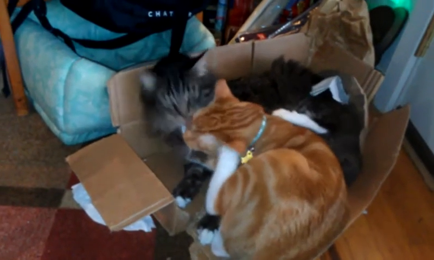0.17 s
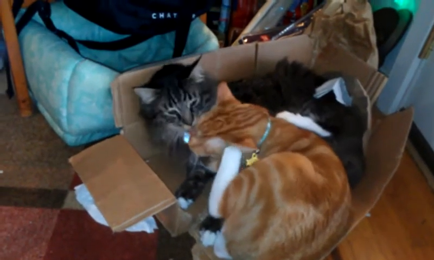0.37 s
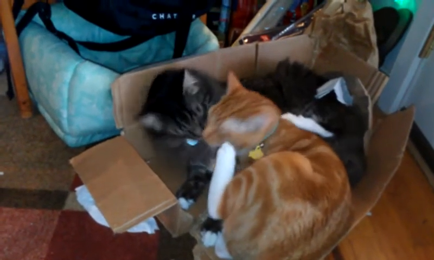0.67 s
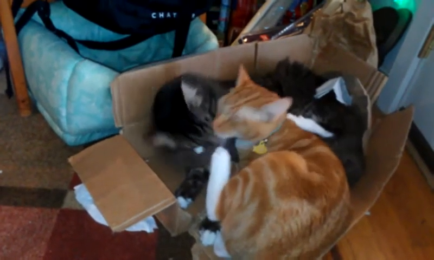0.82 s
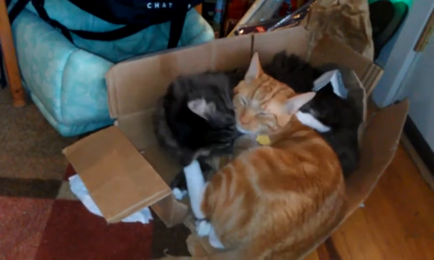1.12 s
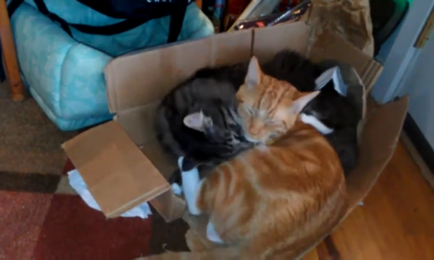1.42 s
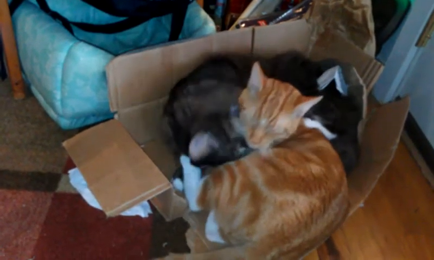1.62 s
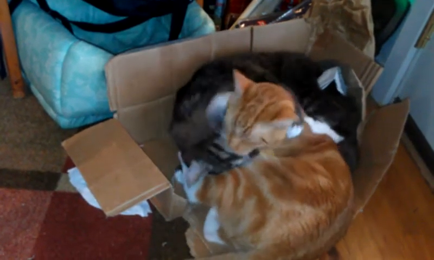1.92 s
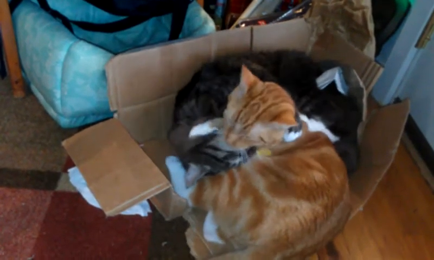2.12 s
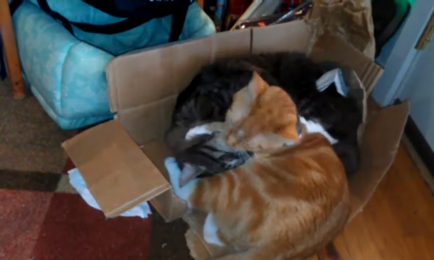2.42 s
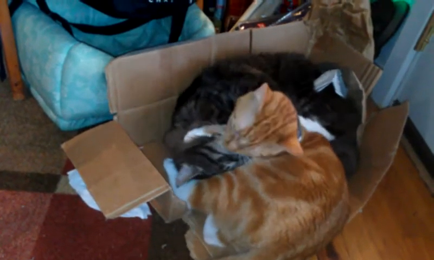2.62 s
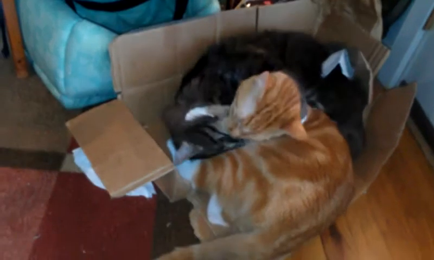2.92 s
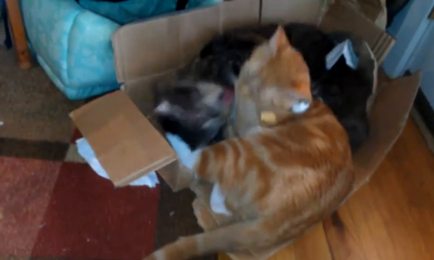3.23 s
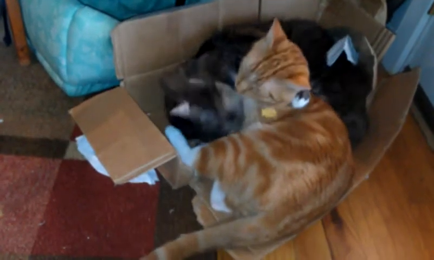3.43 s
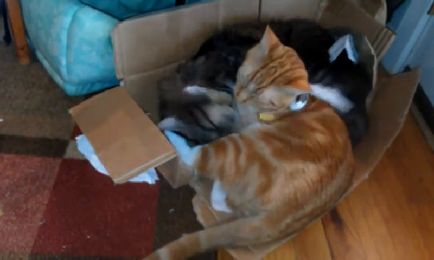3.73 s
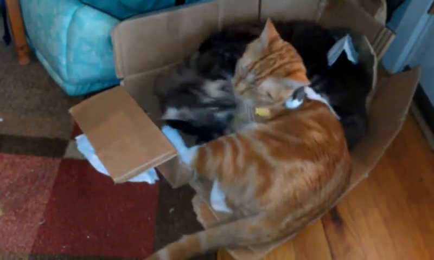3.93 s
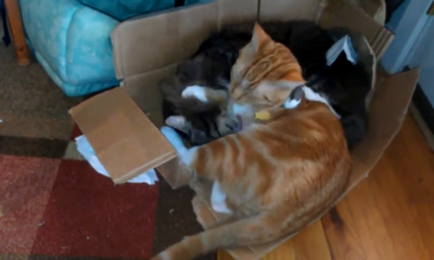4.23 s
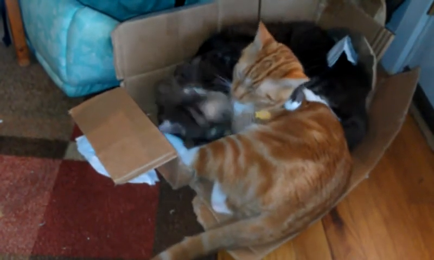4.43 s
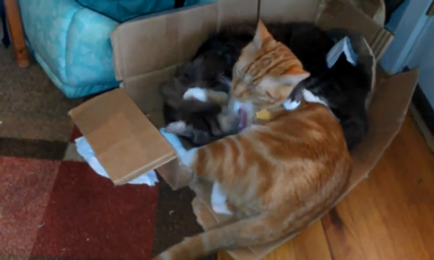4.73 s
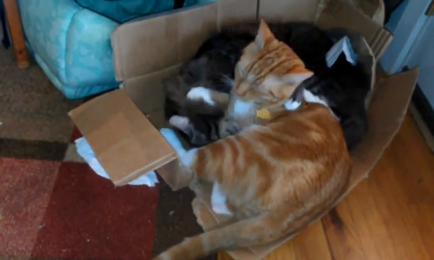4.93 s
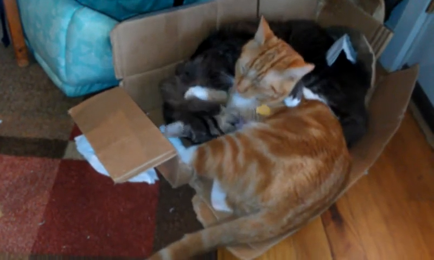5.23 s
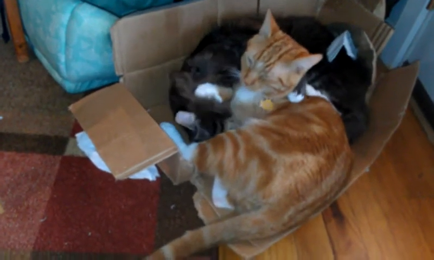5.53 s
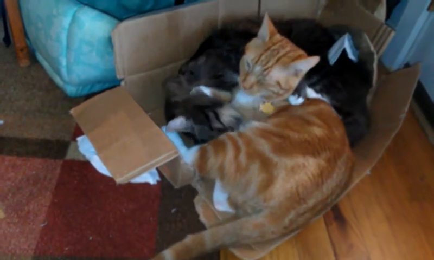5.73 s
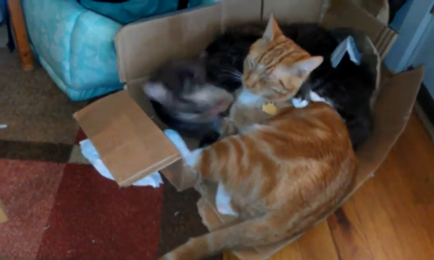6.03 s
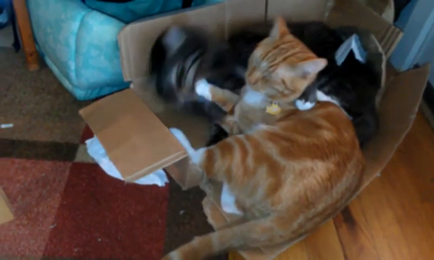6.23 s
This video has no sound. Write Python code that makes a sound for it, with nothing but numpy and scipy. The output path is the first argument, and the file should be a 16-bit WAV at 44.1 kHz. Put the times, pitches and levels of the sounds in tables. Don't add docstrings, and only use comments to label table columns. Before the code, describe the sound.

Close, bright fur-on-cardboard scraping and snapping builds to a knock, fades into sparse licking ticks, then bursts again, above humming indoor air.

```python
import sys
import numpy as np
from scipy import signal
from scipy.io import wavfile
from scipy.ndimage import uniform_filter1d

SR = 44100
rng = np.random.default_rng(int(sys.argv[2]) if len(sys.argv) > 2 else 0)


def how_loud(loudness_db):
    steps = np.asarray(loudness_db, float) / 20
    return 10 ** steps


def output_pcm(signal):
    pcm = np.clip(np.atleast_2d(signal).T, -1, 1) * 32767
    wavfile.write(sys.argv[1], SR, np.round(pcm).astype(np.int16))


N = 280476

# pitch_hz, level_db
CARD = [(300, -30), (900, -19.5), (1400, -28.5), (2080, -22), (2600, -7), (3050, 0), (3500, -8),
        (4000, -21), (4900, -31), (5400, -29.5), (7900, -33.5), (11500, -39.5), (14100, -25.5),
        (16000, -51)]


def evened(x):
    return x / np.sqrt(np.mean(x ** 2) + 1e-20)


def read(points, hz):
    f, value = np.transpose(points)
    return np.interp(np.log(hz + 1), np.log(f + 1), value)


def add(mix, s, sound):
    part = mix[round(s * SR):][:len(sound)]
    part += sound[:len(part)]


def causal(points, depth=1):
    log_gain = depth * np.log(how_loud(read(points, abs(np.fft.fftfreq(4096, 1 / SR)))))
    response = np.fft.ifft(np.exp(np.conj(signal.hilbert(log_gain)))).real[:2048]
    return response / np.linalg.norm(response)


def resonate(x, hz, width):
    turn = np.exp(2j * np.pi * np.cumsum(hz * np.ones(len(x))) / SR)
    r = np.exp(-np.pi * width / SR)
    return 2 * (turn * signal.lfilter([1 - r], [1, -r], x / turn)).real


def band(x, low_hz, high_hz):
    return signal.sosfilt(signal.butter(4, [low_hz, high_hz], "band", fs=SR, output="sos"), x)


def drift(hz):
    slow = signal.butter(1, hz, fs=SR, output="sos")
    return evened(signal.sosfiltfilt(slow, rng.standard_normal(N)))


def air():
    # pitch_hz, level_db_per_hz
    spectrum = [(30, -54), (70, -33.5), (165, -30), (235, -5.5), (420, -5.5), (800, -10.5), (1390, -12.5),
                (2200, -9), (3100, 1.5), (3700, -11.5), (4700, -20.5), (7870, -26.5), (10000, -23),
                (14800, -20)]
    frames, hz = N // 256 + 5, np.fft.rfftfreq(1024, 1 / SR)
    a, b, patches = rng.standard_normal((frames, 513, 3)).T
    patches = evened(uniform_filter1d(uniform_filter1d(patches, 20, 0), 10, 1))
    z = (a + 1j * b) * how_loud(read(spectrum, hz)[:, None] + 1.58 * patches)
    noise = signal.istft(z, nperseg=1024, noverlap=768)[1][:N]
    return how_loud(-45.5) * evened(noise)


def hum():
    # multiple, level_db
    orders = [
        (1, -53),
        (3, -67),
        (4, -73),
    ]
    # pitch_hz, width_hz, level_db
    side_tones = [
        (235.7, 14, -67.5),
        (785.5, 35, -75),
    ]
    # time_s, level_db
    mains = [
        (0.0, -84),
        (2.9, -83.5),
        (4.5, -76),
        (5.7, -82.5),
        (6.36, -77),
    ]
    motor_hz = 315.7
    t = np.arange(N) / SR
    turn = 2 * np.pi * motor_hz * t
    tone = sum(np.sqrt(2) * how_loud(db + 0.27 * drift(1)) * np.sin(k * turn) for k, db in orders)
    buzz = np.sin(2 * np.pi * (120 * t + .15 * drift(4)))
    tone += np.sqrt(2) * how_loud(np.interp(t, *np.transpose(mains))) * buzz
    for hz, width, db in side_tones:
        tone += how_loud(db) * evened(resonate(resonate(rng.standard_normal(N), hz, width), hz, width))
    return tone


def room(x):
    echoes, t = np.zeros(8000), np.arange(8000) / SR
    echoes[np.arange(200, 7980, 20) + rng.integers(0, 20, 389)] = rng.choice([-1., 1.], 389)
    echoes *= how_loud(-60 * t / 0.13)
    return signal.oaconvolve(x, echoes / np.linalg.norm(echoes))[:N]


def brush():
    level_db, middle_s, half_s = -48.5, 1.91, 0.055
    t = np.arange(N) / SR
    stroke = np.exp(-((t - middle_s) / half_s) ** 4)
    return how_loud(level_db) * stroke * band(rng.standard_normal(N), 5000, 17000)


def handling():
    # start_s, peak_db, pitch_hz, width_hz, length_s
    finger_taps = [
        (1.875, -31, 10700, 900, 0.0022),
        (1.933, -33, 5600, 2540, 0.0014),
        (2.7067, -37, 5700, 2500, 0.002),
        (2.748, -37, 10400, 2500, 0.0019),
        (2.786, -32.5, 6200, 2500, 0.0023),
    ]
    # start_s, peak_db, pitch_hz, t60_s
    bumps = [
        (.49, -42, 612, 0.17),
        (1.93, -43, 775, 0.18),
        (2.064, -21.5, 539, 0.03),
        (2.764, -29, 266, 0.033),
        (2.767, -29, 520, 0.018),
        (5.11, -40, 790, 0.064),
    ]
    # pitch_hz, level_db_per_hz
    shell = [(710, -58), (1200, -24), (2450, -12.5), (3400, 0.5), (4700, -17.5), (6230, -5), (7740, -20),
             (8530, -15), (10100, -22), (13600, -12), (16000, -24)]
    slip_s, slip_db, rise_s, slip_t60_s = 2.801, -26.5, 0.0048, 0.084
    out, t = np.zeros(N), np.arange(6000) / SR
    for s, db, hz, width, length in finger_taps:
        push = rng.standard_normal(len(t)) * (t < length)
        ring = resonate(resonate(push, hz, width), hz, width)
        add(out, s, how_loud(db) * ring / abs(ring).max())
    fall_db = slip_db - 60 * np.maximum(t - rise_s, 0) / slip_t60_s
    stroke = np.minimum(t / rise_s, 1) * how_loud(fall_db)
    add(out, slip_s, signal.fftconvolve(stroke * rng.standard_normal(len(t)), causal(shell)))
    for s, db, hz, t60 in bumps:
        swell = how_loud(db - 60 * t / t60) * (1 - np.exp(-t / .003)) ** 2
        add(out, s, swell * np.sin(2 * np.pi * hz * t))
    return out


def nails():
    # start_s, peak_db, pitch_hz
    clicks = [(0.194, -16.5, 4070), (1.0755, -41, 3920), (1.3784, -37, 4130), (1.435, -22, 3720),
              (1.4484, -36, 4050), (2.4588, -50, 4180), (3.1038, -47, 3850), (3.1684, -20.5, 3800),
              (3.5174, -43, 3910), (4.5515, -19, 4600), (5.407, -34, 3930)]
    out, t = np.zeros(N), np.arange(900) / SR
    for (s, db, hz), noise in zip(clicks, rng.standard_normal((len(clicks), len(t)))):
        crack = np.sin(2 * np.pi * hz * t) + 1.5 * band(noise, 2000, 5100)
        add(out, s, how_loud(db - 60 * t / 0.0072) * (1 - np.exp(-t / 0.0012)) * crack)
    return out


def ticks():
    # start_s, peak_db, pitch_hz, scatter_db (relative)
    tongue_claw = [(0.195, -24, 3160, -1), (0.6644, -37, 3220, -11), (2.4596, -20.5, 3300, -6),
                   (2.5265, -33, 2530, 3), (2.5601, -24.5, 2550, 1.5), (2.696, -33, 2620, -4),
                   (2.7081, -31.5, 3230, 4), (3.1048, -19.5, 3240, -13), (3.146, -26, 2970, -5),
                   (3.1674, -27, 2820, -10), (3.4104, -28, 2610, -1), (3.5078, -25, 3270, -2),
                   (3.5179, -24, 2970, -1.5), (3.5942, -31.5, 3040, -5), (3.8988, -25, 3120, 4),
                   (4.02, -31, 2980, -7), (4.2185, -27.5, 3000, -7), (4.5518, -28.5, 2630, 5.5),
                   (4.5534, -21.5, 2770, -12), (4.673, -33, 3260, 1), (4.8416, -26, 2370, -10),
                   (5.2126, -35, 2900, -2), (5.4086, -21, 2890, -11), (5.424, -33, 3180, -1),
                   (5.671, -34, 3110, 2), (5.8416, -27.5, 2840, -8)]
    # start_s, peak_db, pitch_hz
    snaps = [(1.077, -27.5, 2660), (1.1197, -28, 3080), (1.2084, -28, 3080), (1.278, -18, 2940),
             (1.3797, -21, 2970), (1.449, -18.5, 2930), (1.479, -15.5, 3040), (1.515, -23, 2830),
             (1.5384, -18, 3170), (1.7628, -19, 3280), (1.7799, -19.5, 2990), (1.8341, -17.5, 2900),
             (1.8946, -12.5, 2910), (2.0055, -12, 2740), (2.0466, -15.5, 3100), (6.1754, -16.5, 2740),
             (6.2948, -12, 3310), (6.3236, -12, 2730), (1.30, -19, 3040), (1.492, -16.5, 2990),
             (1.9052, -15, 2990), (6.248, -15.5, 3120)]
    tick_s, snap_s, scatter_t60_s = .0028, .004, .06
    out, t, card = np.zeros(N), np.arange(4400) / SR, causal(CARD)
    stiff, crisp = causal(CARD, depth=0.9), causal(CARD, depth=.65)
    rows = [(*row, tick_s, crisp) for row in tongue_claw]
    for s, db, hz in snaps:
        scatter_db = -5 + 0.48 * (db + 23)
        rows.append((s, db, hz, scatter_db, snap_s, stiff))
    scatter = rng.standard_normal((len(rows), len(t)))
    for (s, db, hz, scatter_db, length, body), noise in zip(rows, scatter):
        swell = np.sin(np.pi * np.minimum(t / length, 1) ** 0.79) ** 2
        crack = 1.5 * band(noise[::-1], 1200, 4950)
        snap = signal.fftconvolve(swell * (np.cos(2 * np.pi * hz * t) + crack), body)[:len(t)]
        slips = resonate(noise, hz, 1500) + .5 * noise
        slips = evened(signal.fftconvolve(slips, card)[:len(t)])
        tail = slips * how_loud(scatter_db - 60 * t / scatter_t60_s) * (1 - np.exp(-t / 0.0031))
        add(out, s, how_loud(db) * (snap / abs(snap).max() + .5 * tail))
    return out


def rasp(spread_db, clump_db, low_hz, high_hz, cycles):
    grains_per_s = 4400
    size = how_loud(spread_db * np.minimum(rng.exponential(1, N), 4)) * rng.choice([-1., 1.], N)
    slips = size * (rng.random(N) < grains_per_s / SR) * how_loud(clump_db * drift(60.9))
    kind, t, out = rng.integers(0, 12, N), np.arange(400) / SR, np.zeros(N)
    for k, hz in enumerate(np.geomspace(low_hz, high_hz, num=12)):
        blip = np.cos(2 * np.pi * hz * t) * np.exp(-t * hz / cycles)
        blip[0] += 1.5
        out += signal.oaconvolve(slips * (kind == k), blip)[:N]
    return evened(signal.oaconvolve(out, causal(CARD))[:N])


def scuffs():
    # hardest_s, rub_db, build_up_s, let_go_s, claw_share_db
    shifts = [(0.478, -27, 0.094, 0.17, 4), (0.789, -42, 0.13, 0.11, -12), (1.13, -38, 0.098, 0.062, -6),
              (1.231, -34.5, 0.054, .08, -5), (1.299, -31, 0.11, 0.093, 2.5), (1.41, -31, 0.15, 0.15, 1.5),
              (1.50, -26.5, 0.11, 0.13, 3.5), (1.549, -25, 0.051, 0.044, -2.5),
              (1.70, -28.5, 0.17, 0.16, 2), (1.77, -30, 0.047, 0.047, 3.5), (1.901, -26.5, .08, 0.12, 4.5),
              (1.95, -31, 0.061, .04, 0), (2.005, -23.5, 0.045, 0.04, 9.5), (2.066, -15, .03, 0.05, -2),
              (2.11, -32, 0.066, 0.093, -9), (2.19, -47.5, .05, 0.16, -4),
              (6.14, -33.5, 0.087, 0.054, -0.5), (6.20, -24.5, 0.047, 0.095, -3),
              (6.249, -23.5, 0.13, .1, 1.5), (6.35, -22.5, 0.03, 0.11, -2)]
    # hardest_s, rub_db, build_up_s, let_go_s, claw_share_db
    strokes = [
        (3.01, -43.5, 0.082, 0.14, 4),
        (3.138, -36, 0.082, 0.11, 1),
        (3.911, -35.5, 0.096, .1, 0.5),
        (4.12, -42.5, 0.09, 0.13, -9),
        (4.22, -39.5, .03, 0.032, -2),
    ]
    swing_db, roundness = 23, 1.57
    t = np.arange(N) / SR
    heard = rasp(spread_db=2, clump_db=2.0, low_hz=1483, high_hz=5680, cycles=1.7)
    body, boom = band(heard, 1900, 3700), band(heard, 100, 1900)
    edge, fizz = band(heard, 3700, 5200), band(heard, 5200, 17000)
    edge = edge + resonate(edge, 4490, 560)
    layers = [body, boom, edge, fizz]
    power = np.zeros((len(layers), N))
    for s, rub_db, build, let_go, claw_db in shifts + strokes:
        away = np.where(t < s, (s - t) / max(build, .01), (t - s) / max(let_go, .01))
        on = away < 3
        boom_db = 0.5 - 0.26 * claw_db - .2 * (rub_db + 23.5)
        edge_db = -2.2 + claw_db
        fizz_db = -1.5 + 0.21 * claw_db
        colour = how_loud(np.array([0, boom_db, edge_db, fizz_db]))
        swell = how_loud(rub_db - swing_db * away[on] ** roundness)
        power[:, on] += (colour[:, None] * swell) ** 2
    return (np.sqrt(power) * layers).sum(0)


def scene():
    box = band(scuffs() + ticks(), 185.4, 18000) + nails()
    rest = handling() + air() + hum() + brush()
    return (box + how_loud(-11.0) * room(box) + rest)[None]


def camera_rounding(x):
    # pitch_hz, step_db
    coarseness = [(200, -14), (1400, -8), (3000, -14), (4300, -5), (5400, 2), (8000, 6), (10500, 3),
                  (13500, 6), (15000, 3)]
    # pitch_hz, level_db
    mask = [(1, -41), (170, -40), (6000, -42), (7800, -36), (9500, -39.5), (11500, -40.5), (14000, -40),
            (16000, -43)]
    top_line, grid, scatter_db = 732, 395, 1.8
    edges = np.r_[0:40:8, 40:240:20, 240:1024:32]
    widths, edge_hz = np.diff(np.r_[edges, 1024]), edges * SR / 2048
    n, lead = np.arange(2048)[:, None] + .5, 1024 - grid
    window = np.sin(np.pi * n / 2048)
    basis = window * np.cos(np.pi / 1024 * (n + 512) * n[:1024].T) / np.sqrt(512)
    padded = np.pad(x, (1024 + lead, 3072))
    frames = np.lib.stride_tricks.sliding_window_view(padded, 2048)[::1024].copy()
    lines = frames @ basis
    band_db = 10 * np.log10(np.add.reduceat(lines ** 2, edges, axis=1) / widths + 1e-20)
    under_db = band_db - band_db.max(1, keepdims=True) + scatter_db * rng.standard_normal(band_db.shape)
    bends = np.diff(frames, 2, append=0, prepend=0) ** 2
    blocks = bends.reshape(len(frames), 16, 128).mean(2)
    sudden = blocks.max(1) > 4 * np.median(blocks, axis=1)
    step_db = band_db + read(coarseness, edge_hz) - 14 * sudden[:, None]
    step = np.repeat(how_loud(step_db + scatter_db * rng.standard_normal(band_db.shape)), widths, axis=1)
    kept = np.sign(lines) * step * np.floor(abs(lines) / step + .41)
    kept += .1 * step * rng.standard_normal(step.shape) * (kept != 0).any(1, keepdims=True)
    kept *= np.repeat(under_db > read(mask, edge_hz), widths, axis=1) * (np.arange(1024) < top_line)
    halves = (kept @ basis.T).reshape(-1, 2, 1024)
    return (halves[1:, 0] + halves[:-1, 1]).ravel()[lead:lead + N]


def low_pass(x):
    return signal.sosfilt(signal.butter(12, 16240, fs=SR, output="sos"), x)


def record(dry):
    ceiling = 1.
    bent = ceiling * np.tanh(dry[0] / ceiling)
    mix = camera_rounding(bent)[None]
    return low_pass(mix)


dry = scene()
out = record(dry)
output_pcm(out)
```